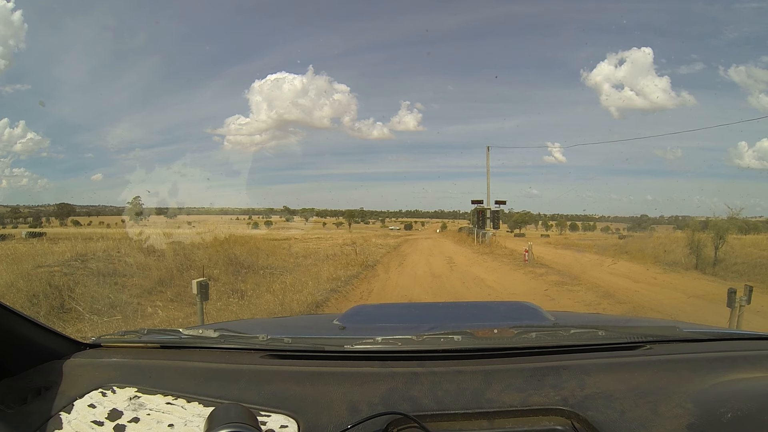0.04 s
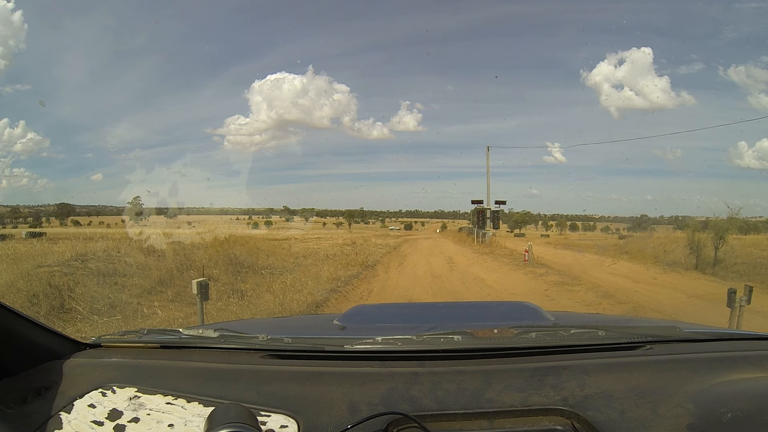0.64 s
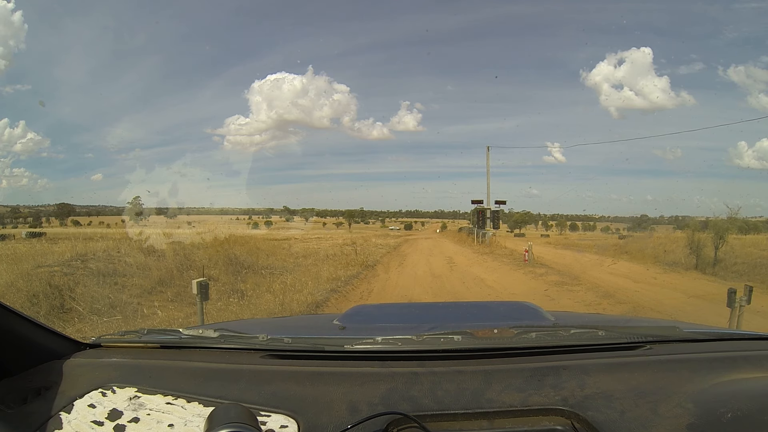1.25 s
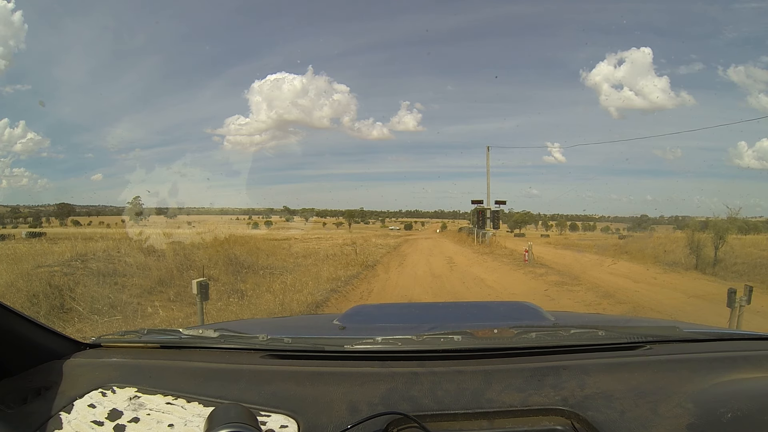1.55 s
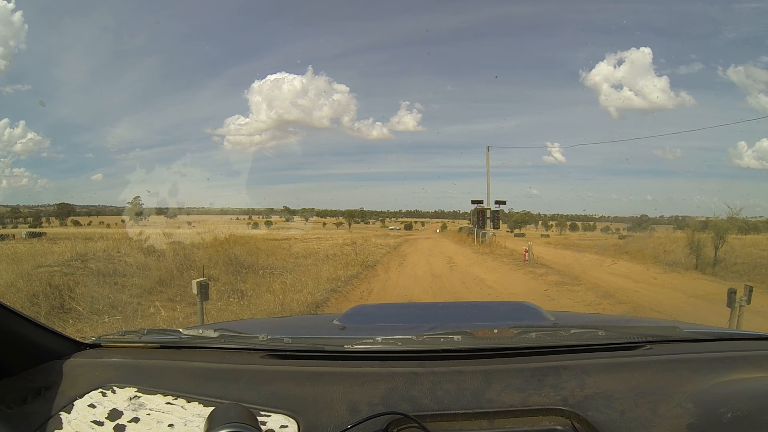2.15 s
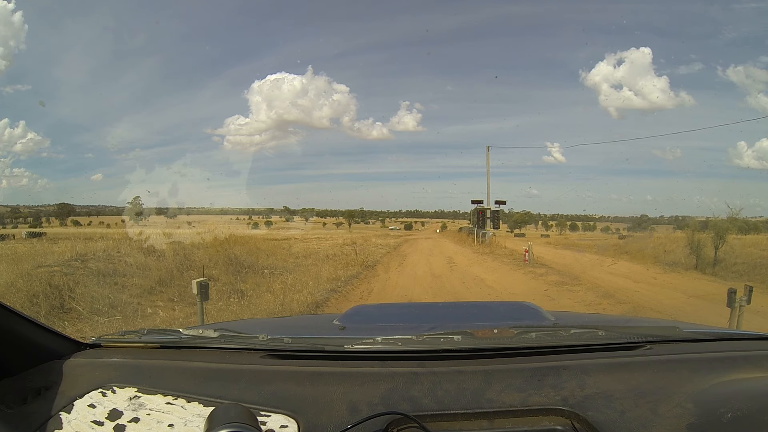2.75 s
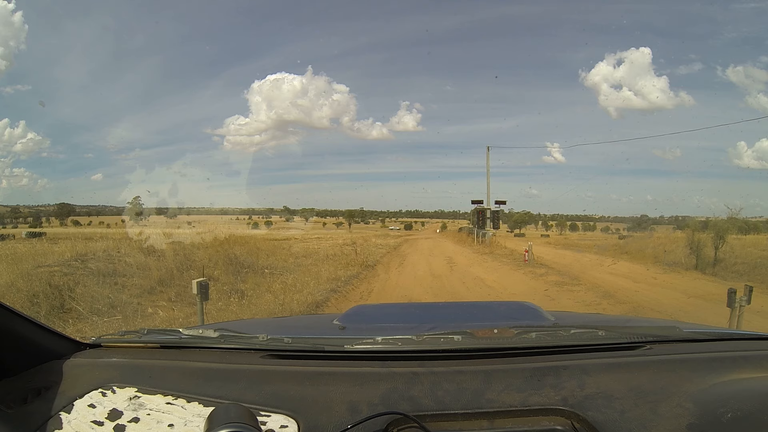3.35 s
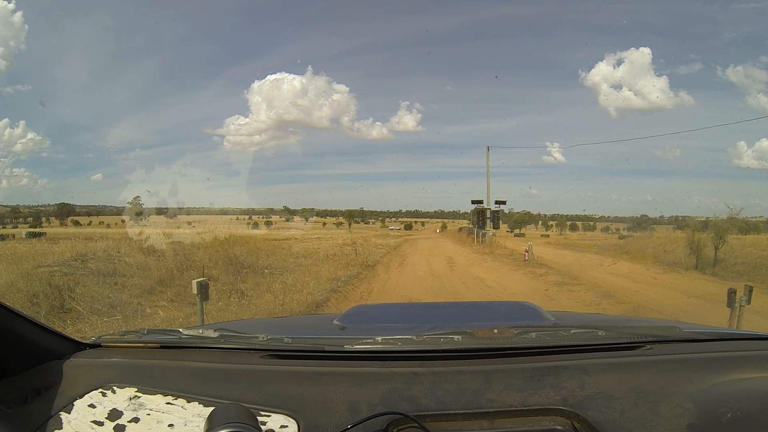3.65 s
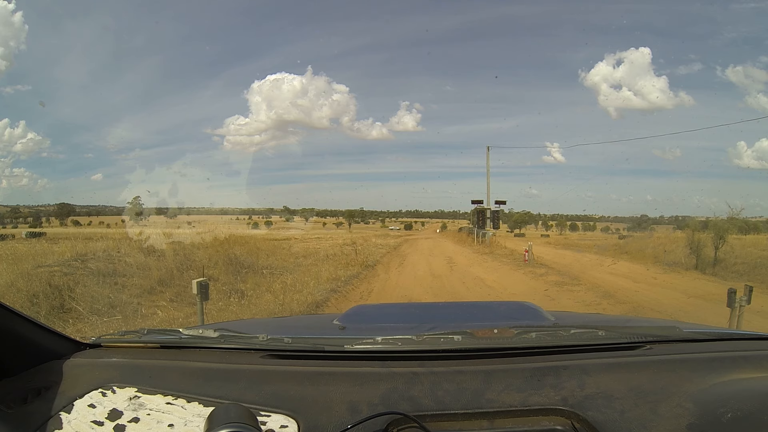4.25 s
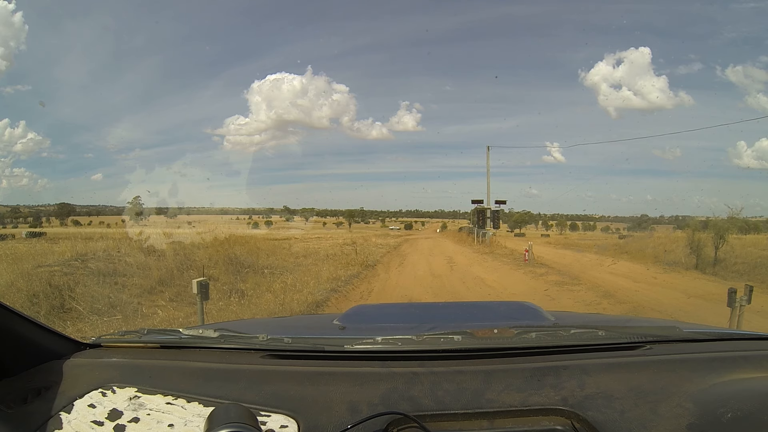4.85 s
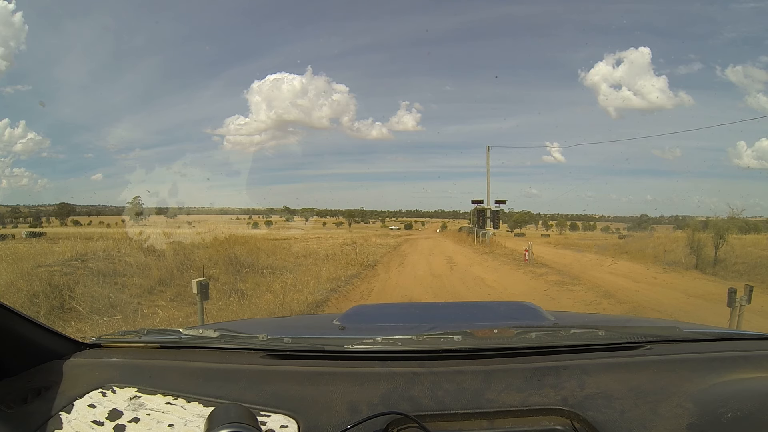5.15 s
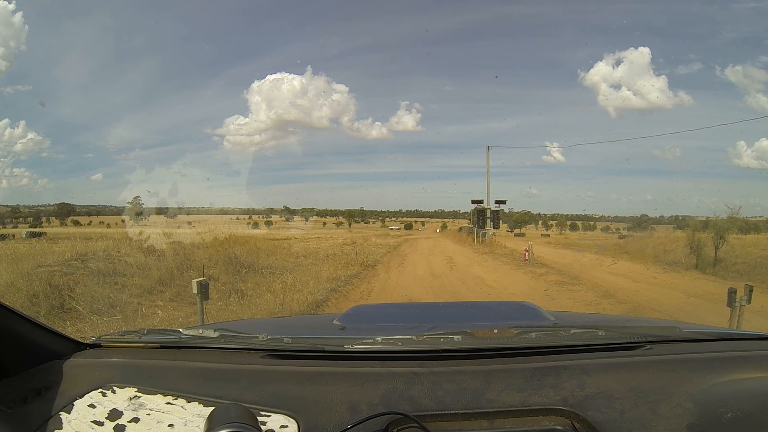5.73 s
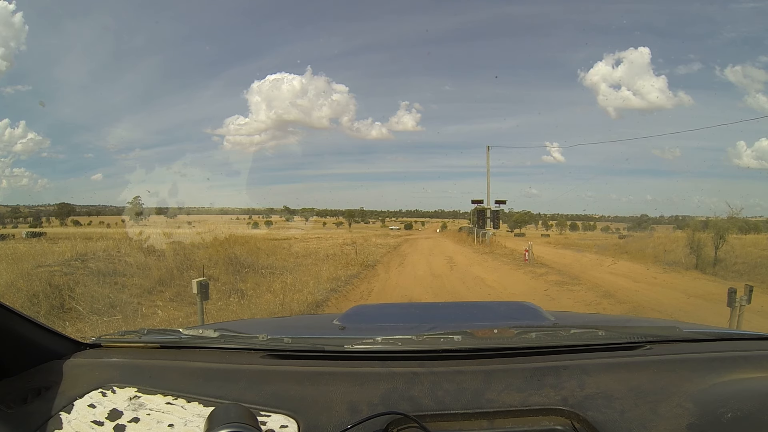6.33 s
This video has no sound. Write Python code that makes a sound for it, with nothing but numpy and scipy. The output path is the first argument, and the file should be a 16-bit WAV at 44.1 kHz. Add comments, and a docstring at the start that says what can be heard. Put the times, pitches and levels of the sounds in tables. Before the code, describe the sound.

From inside a slow car on a dirt road, a throbbing engine is revved in several short, booming blips over steady road noise.

```python
"""Inside a car creeping along a dirt road, one microphone behind the windscreen, tyres and engine bay
rushing over ticking grit throughout. The flat-four is blipped at once, its unevenly spaced exhaust
beats booming in the cabin. At 0.8 s a small metal piece clinks. Three more blips follow, burbling as
the speed rises, each topped by an exhaust bark, the loudest at 2.7 s. The engine then sinks back,
chugging; the metal scrapes faintly at 4.4 s, and a last blip barks at 5.7 s."""
import sys
import numpy as np
from scipy import signal
from scipy.fft import rfft, irfft, next_fast_len
from scipy.io import wavfile
from scipy.ndimage import uniform_filter1d, minimum_filter1d

SR = 44100
rng = np.random.default_rng(int(sys.argv[2]) if len(sys.argv) > 2 else 0)


def int16_out(signal):
    """Quantize to a 16-bit WAV file."""
    q = np.round(np.clip(np.atleast_2d(signal).T, -1, 1) * 32767)
    wavfile.write(sys.argv[1], SR, q.astype(np.int16))


N = 281799
CRUISE_HZ = 80  # reference firing rate

# exhaust tones before the cabin colours them:
# cycle_multiple, cruise_level_db, speed_db_per_octave, full_throttle_db, lugging_db
EXHAUST_TONES = [(2, -32.5, 20.5, -0.5, 5), (3, -21.5, -1.5, -16, 0), (4, -13.5, -11, 2, -0.5),
                 (5, -29.5, 7.5, 9.5, -15), (6, -44.5, 5.5, -9.5, 19), (7, -29, 10.5, 12, -0.5),
                 (8, -35, 15, 17.5, -1.5), (9, -38, 1.5, 4.5, 8.5), (10, -41.5, 4.5, 11.5, 12),
                 (11, -34.5, -1, 7, 3)]
# how strongly the cabin booms at the microphone: pitch_hz, gain_db
CABIN_RESPONSE = [(32, -15.5), (45, -18.5), (50, -5), (54, -4), (60, -1.8), (64, 3), (71, -4), (78, -2),
                  (87, 1.5), (97, 1), (106, 3), (120, 4.5), (137, 6.5), (151, 3.5), (165, -14), (182, -25),
                  (205, -11), (230, -28)]
# one tone of the cycle swells briefly, as the cylinders fall out of balance or at a knock: centre_s,
# half_length_s, cycle_multiple, level_db
EXHAUST_CHUGS = [(.16, 0.022, 6, -13), (0.264, 0.033, 8, -13), (0.573, 0.18, 2, -32.5),
                 (.57, 0.1, 6, -20.5), (1.498, 0.037, 2, -14), (1.505, 0.04, 6, -30), (1.563, .04, 3, -20),
                 (1.798, 0.017, 6, -12.5), (1.805, 0.029, 10, -25.5), (1.976, 0.048, 7, -25.5),
                 (2.22, 0.15, 2, -16), (2.44, 0.13, 4, -20.5), (2.545, 0.021, 9, -27),
                 (2.847, 0.01, 2, -19), (2.99, 0.082, 2, -17.5), (3.02, 0.06, 3, -38),
                 (3.254, 0.2, 2, -34.5), (3.3, .17, 3, -28.5), (3.393, 0.11, 4, -16),
                 (3.624, 0.013, 3, -10), (3.9, .11, 7, -22.5), (3.95, 0.049, 3, -21),
                 (3.974, 0.022, 6, -19), (4.06, 0.094, 8, -25.5), (4.01, .035, 4, -29),
                 (5.44, 0.072, 4, -18), (5.587, .04, 3, -24), (5.87, .09, 3, -31.5), (6.22, .18, 3, -24.5),
                 (6.22, 0.18, 5, -25.5), (6.25, 0.078, 7, -34)]
def exhaust_boom(cycle, firing_hz, load, lugging, dip):
    """Unequal pipes bunch the four firings: side tones make the firing tone throb in the cabin."""
    turn, octaves = 2 * np.pi * cycle, np.log2(firing_hz / CRUISE_HZ)
    cabin_hz, cabin_db = np.transpose(CABIN_RESPONSE)
    full_dip_db, smear_rad = 16.5, .25
    out = from_db(-42) * np.sin(turn)  # the engine rocks on its mounts once a cycle
    for k, db, speed_db, load_db, lugging_db in EXHAUST_TONES:
        resonance_db = np.interp(np.log(k * firing_hz / 4), np.log(cabin_hz), cabin_db)
        drive_db = speed_db * octaves + load_db * load + lugging_db * lugging
        level_db = db + resonance_db + drive_db - full_dip_db * dip
        chug = sum(from_db(chug_db) * bump(s, half_s)
                   for s, half_s, multiple, chug_db in EXHAUST_CHUGS if multiple == k)
        # the bunching wanders a little, so no two throbs are alike
        flutter_db = 1.6 * (k != 4) * drift(7)
        wander = .22 * min(abs(k - 4), 2) * drift(3.5)
        # the cabin delays tones far from the firing tone, softening each throb
        lag = smear_rad * (k - 4) ** 2
        out = out + (from_db(level_db + flutter_db) + chug) * np.sin(k * turn + wander - lag)
    return np.sqrt(2) * out


# engine speed: time_s, firing_hz
ENGINE_SPEED = [(0.0, 49.8), (0.076, 50.0), (0.177, 73.7), (0.263, 50.6), (0.428, 72.3), (0.751, 64.9),
                (1.065, 51.8), (1.409, 99.5), (1.89, 80.9), (2.12, 105.5), (2.583, 88.8), (2.855, 120.3),
                (3.301, 101.1), (3.802, 78.9), (4.205, 66.6), (4.704, 57.1), (5.351, 53.4), (5.587, 87.1),
                (5.702, 96.0), (6.095, 86.4), (6.39, 85.8)]
def crankshaft():
    """The firing rate and the running count of engine cycles, four firings to each."""
    firing_hz = in_time(ENGINE_SPEED)
    return firing_hz, np.cumsum(firing_hz) / (4 * SR)


# presses of the accelerator: down_s, lifted_s, opening (0-1)
PEDAL_PRESSES = [(0, 0.347, 0.71), (1.001, 1.404, 0.46), (1.852, 2.067, 0.76), (2.542, 2.806, 0.5),
                 (5.18, 5.72, 0.54)]
def throttle(down_s, up_s):
    """Throttle opening, 0-1: each press ramps in and out."""
    t = np.arange(N) / SR
    opening = sum(depth * np.clip((t - down) / down_s, 0, 1) * np.clip(1 - (t - lifted) / up_s, 0, 1)
                  for down, lifted, depth in PEDAL_PRESSES)
    return np.clip(opening, 0, 1)


# dips in the exhaust note: centre_s, half_length_s, depth (0-1), shudder (0-1)
EXHAUST_DIPS = [(.06, 0.035, 1, 0.53), (.215, 0.014, 1, 0.4), (.42, 0.015, 0.6, 0.16),
                (.48, 0.06, 0.27, 0.2), (1.04, 0.032, 1, 0.04), (1.27, 0.043, 0.36, 0.23),
                (1.52, 0.034, 0.04, 0.33), (1.858, 0.057, 0.56, 0.35), (2.14, 0.03, 0.4, 0.4),
                (2.555, 0.019, 0.9, .55), (3.675, 0.02, 0.7, 0), (4.074, 0.015, 0.8, 0.04),
                (5.53, 0.033, 0.15, 0), (5.868, 0.41, 0.13, 0.04)]
def exhaust_dips():
    """Brief stumbles and slower sags in loudness, and the low shudder that comes with them."""
    return swells(EXHAUST_DIPS)


# further overtones of the engine cycle: cycle_multiple, relative_db
ENGINE_OVERTONES = [(6, -3.5), (8, 3.5), (9, -1.5), (10, -7.5), (11, 4.5), (12, -4), (13, 3.5), (14, 1),
                    (15, -9), (16, -3), (17, 0), (19, -9.5), (20, -11.5)]
# modes of the cabin air around the microphone: pitch_hz, width_hz, gain_db
CABIN_AIR_MODES = [(61, 31.5, 2.5), (120, 50, -2.5), (153, 22, -3.5)]
def cabin_rumble(cycle, lugging, shudder, duck_db):
    """Overtones and unequal firings shake the cabin air, most in a shudder or when the engine lugs."""
    level_db = -25.5 + 0.21 * duck_db + np.maximum(16.5 * shudder, 10 * lugging)
    tones = overtones(cycle, ENGINE_OVERTONES, flutter_db=-4.0, wander_rad=1.0)
    steady = evened(resonate(tones, CABIN_AIR_MODES))
    uneven = .7 * evened(resonate(firing_errors(cycle), CABIN_AIR_MODES))
    return from_db(level_db) * evened(band(steady + uneven, 45, 146, order=4))


# overtones under load: cycle_multiple, relative_db
LOAD_OVERTONES = [(8, -3.5), (9, -16.5), (11, -22), (12, 7.5), (13, -12), (14, -11.5), (16, -7), (17, -10)]
# panels that sing under load: pitch_hz, width_hz, gain_db
SINGING_MODES = [(204.4, 11, 2.5), (294.4, 18, -7), (393, 30, -15.5)]
# barks at the top of each blip: centre_s, half_length_s, level_db
EXHAUST_BARKS = [(.15, .06, -28), (1.385, .035, -25), (2.065, .085, -17.5), (2.712, .06, -14.5),
                 (5.7, .08, -29)]
def exhaust_bark(cycle):
    """The panels sing roughly as the overtones of each blip sweep through them."""
    tones = overtones(cycle, LOAD_OVERTONES, flutter_db=1.3, wander_rad=.2)
    singing = evened(resonate(tones, SINGING_MODES)) * (1 + .17 * drift(45))
    return singing * sum(from_db(db) * bump(s, half_s) for s, half_s, db in EXHAUST_BARKS)


# body panels around the microphone: pitch_hz, width_hz, gain_db
PANEL_MODES = [(206.4, 8.6, 3.5), (256, 19, -1.5), (288.3, 29, -6.5), (325.5, 15.3, -4.5), (384.8, 18, -12)]
def panel_mutter(cycle, firing_hz, load, shudder, duck_db, buzz_db, roughness):
    """The panels mutter with the ragged firings and buzz at each jolt."""
    speed_db = 2 * np.log2(firing_hz / CRUISE_HZ)
    level_db = -32.5 + duck_db - 0.5 * shudder + 3 * load + speed_db + buzz_db
    puffs = rms_one(firing_errors(cycle) + 0.024 * rng.standard_normal(N))
    tones = overtones(cycle, ENGINE_OVERTONES, flutter_db=4.5, wander_rad=0.97)
    ragged = evened(resonate(tones, PANEL_MODES)) + roughness * evened(resonate(puffs, PANEL_MODES))
    return from_db(level_db) * evened(band(ragged, 197.4, 456, order=4))


# jolts of the engine: centre_s, half_length_s, buzz_change_db, roar_change_db
ENGINE_JOLTS = [(.125, 0.032, 1, 0), (.25, 0.023, 0.5, -2), (1.2, 0.11, 5.5, -0.5), (1.35, 0.047, 3, 0),
                (1.803, .022, 4.5, 3), (2.224, 0.054, 2, -1), (2.545, 0.036, 9, -1.5),
                (2.82, 0.11, 1.5, 1.5), (3.65, 0.035, 6.5, -1.5), (3.88, 0.091, 2.5, 0),
                (4.23, 0.11, 2.5, 1), (6.36, .025, 4, 1)]
def jolts():
    """Each jolt lifts the panels' buzz and may shift the engine bay's roar."""
    return swells(ENGINE_JOLTS)


# the roar, from inside the cabin: frequency_hz, relative_db
ROAR_SPECTRUM = [(22, 3), (36, 6.5), (70, 12), (200, -1.5), (330, 5.5), (440, 3.5), (530, -2), (640, 0),
                 (790, -4), (870, 0.5), (1050, -5), (1200, -11), (2200, -13.5), (2900, -22)]
# the hiss above it: frequency_hz, relative_db
HISS_SPECTRUM = [(1800, -4.5), (2700, -4), (3300, 0), (4800, -0.5), (6000, -6), (7800, -8.5), (9200, -9.5),
                 (10000, -14), (11200, -16), (13000, -30), (15500, -35)]
def road_noise(cycle, duck_db, jolt_db, load, pulsing, grit_per_s, grit_db):
    """Tyres and engine bay rush over fine grit; the firings chop the roar more deeply under load."""
    beat = np.cos(8 * np.pi * cycle)
    chopped = (1 + (pulsing + 0.16 * load) * beat) * rng.standard_normal(N)
    roar = coloured(chopped, ROAR_SPECTRUM) * from_db(0.4 * drift(16))
    grit = (rng.random(N) < grit_per_s / SR) * rng.standard_normal(N)
    rush = (1 + pulsing * beat) * rng.standard_normal(N)
    hiss = coloured(rush + from_db(grit_db) * rms_one(grit), HISS_SPECTRUM) * from_db(0.58 * drift(31))
    return from_db(-32 + duck_db + jolt_db) * roar + from_db(-53.5 + 0.93 * duck_db) * hiss


# the recorder's gain as heard on the background, a set curve: time_s, relative_db
RECORDER_GAIN = [(0, -37.5), (0.24, -41), (0.36, -45), (0.74, -43.5), (0.9, -46.5), (1.25, -44.5),
                 (1.85, -42), (2.8, -41.5), (3.8, -42), (4.62, -42), (5.15, -38), (5.34, -39), (5.48, -44),
                 (5.69, -44.5), (6.04, -40.5), (6.39, -39.5)]
def background_ducking():
    """The background rush ducks as the recorder's gain drops under loud bass, then recovers."""
    gain_db = in_time(RECORDER_GAIN)
    return gain_db - gain_db.mean()


def windscreen_echo(x, delay_s, gain):
    """The nearby glass returns the noise to the microphone a moment later, rippling its spectrum."""
    return x - gain * np.interp(np.arange(N) - delay_s * SR, np.arange(N), x, left=0)


# light touches of loose metal: start_s, level_db, ringing (0-1)
METAL_TOUCHES = [(.794, -53, .3), (.802, -47, 1), (.806, -46, 1), (.817, -54, 0), (.831, -53, .3),
                 (4.449, -48.5, 0)]
# modes of the piece: pitch_hz, relative_db, t60_s
METAL_MODES = [(2350, 5.5, .025), (3400, 5, .03), (4650, -2, .025), (6650, -2, .035), (7150, 3, .03),
               (7380, 0, .03), (10500, -6, .018)]
def metal_clink(scrape_db, scrape_s):
    """Each touch is a short scrape that may ring the metal's modes."""
    t, out = np.arange(N // 20) / SR, np.zeros(N)
    for s, db, ringing in METAL_TOUCHES:
        scrape = band(rng.standard_normal(len(t)), 1400, 7600, order=3)
        touch = from_db(scrape_db) * scrape * np.exp(-t / scrape_s)
        for hz, mode_db, t60 in METAL_MODES:
            ring = from_db(mode_db - 60 * t / t60) * np.sin(2 * np.pi * hz * t)
            touch += ringing * ring * rng.choice([-1, 1])
        start = int(s * SR)
        out[start:start + len(t)] += from_db(db) * touch
    return out


def metal_ping(start_s, pitch_hz, level_db, attack_s, hold_s, t60_s):
    """One high mode swells into a short ping as the piece slides."""
    t = np.arange(N) / SR - start_s
    attack = np.clip(t / attack_s, 0, 1)
    released_s = np.clip(t - attack_s - hold_s, 0, 1)
    return from_db(level_db - 60 * released_s / t60_s) * attack * np.sin(2 * np.pi * pitch_hz * t)


def overtones(cycle, orders, flutter_db, wander_rad):
    """Multiples of the cycle rate, each unsteady in strength and phase."""
    turn = 2 * np.pi * cycle
    return sum(from_db(db + flutter_db * drift(2.8)) * np.cos(k * turn + wander_rad * drift(5.2))
               for k, db in orders)


def firing_errors(cycle):
    """One click per firing, as large as that firing is stronger or weaker than usual."""
    firings = np.flatnonzero(np.diff(np.floor(4 * cycle)))
    clicks = np.zeros(N)
    clicks[firings] = rng.standard_normal(2000)[:len(firings)]
    return clicks


def from_db(db):
    """Decibels to gain."""
    return 10 ** (np.asarray(db) / 20)


def rms_one(x):
    """Scale to unit power."""
    return x / np.sqrt(np.mean(x ** 2) + 1e-20)


def in_time(rows):
    """A curve of (time_s, value) points at every sample."""
    return np.interp(np.arange(N) / SR, *np.transpose(rows))


def bump(s, half_s):
    """A smooth swell of height 1 around time s."""
    return np.exp(-((np.arange(N) / SR - s) / half_s) ** 2)


def swells(rows):
    """Each column after centre and half length as a sum of smooth bumps."""
    return sum(np.outer(heights, bump(s, half_s)) for s, half_s, *heights in rows)


def drift(rate_hz):
    """A slow random wander of spread 1."""
    hop = 40
    r = np.exp(-2 * np.pi * rate_hz * hop / SR)
    slow = signal.lfilter([1], [1, -2 * r, r * r], rng.standard_normal(N // hop + 2002))[2000:]
    return np.interp(np.arange(N) / hop, np.arange(len(slow)), rms_one(slow))


def evened(x, size=3000):
    """Hold the power at 1 over a few engine cycles, keeping the beat inside them."""
    power = uniform_filter1d(uniform_filter1d(x ** 2, size), size)
    return x / np.sqrt(np.abs(power) + 1e-12)


def band(x, low_hz, high_hz, order):
    """Band-pass."""
    sos = signal.butter(order, [low_hz, high_hz], "band", fs=SR, output="sos")
    return signal.sosfilt(sos, x + 1e-18)


def resonate(x, modes):
    """Parallel resonances with alternating signs."""
    out = 0
    for k, (hz, width, db) in enumerate(modes):
        r = np.exp(-np.pi * width / SR)
        poles = [1, -2 * r * np.cos(2 * np.pi * hz / SR), r * r]
        ring = (1 - r * r) / 2 * signal.lfilter([1, 0, -1], poles, x + 1e-18)
        out = out + (-1) ** k * from_db(db) * ring
    return out


def coloured(x, spectrum):
    """Give x a spectrum that falls 23 dB an octave beyond its ends; rms 1."""
    hz, db = np.transpose(spectrum)
    size = next_fast_len(N)
    octave, knots = np.log2(np.arange(size // 2 + 1) * SR / size + 1), np.log2(hz)
    outside = np.abs(octave - np.clip(octave, knots[0], knots[-1]))
    gain = from_db(np.interp(octave, knots, db) - 23 * outside)
    return rms_one(irfft(rfft(x, size) * gain, size)[:N])


def limited(x, ceiling, size=900):
    """A limiter eases the gain down around each peak that would pass the ceiling."""
    gain = minimum_filter1d(ceiling / np.maximum(np.abs(x), ceiling), 2 * size)
    return x * uniform_filter1d(uniform_filter1d(gain, size), size)


def scene():
    """Engine, road and loose metal at one microphone behind the windscreen."""
    firing_hz, cycle = crankshaft()
    load = throttle(down_s=0.13, up_s=0.073)
    lugging = load * np.clip(4 * np.log2(CRUISE_HZ / firing_hz), 0, 1)  # throttle open at low speed
    dip, shudder = exhaust_dips()
    buzz_db, roar_db = jolts()
    duck_db = background_ducking()
    engine = exhaust_boom(cycle, firing_hz, load, lugging, dip)
    engine += cabin_rumble(cycle, lugging, shudder, duck_db)
    engine += panel_mutter(cycle, firing_hz, load, shudder, duck_db, buzz_db, roughness=2.57)
    engine += exhaust_bark(cycle)
    road = road_noise(cycle, duck_db, roar_db, load, pulsing=0.085, grit_per_s=220, grit_db=-17.5)
    road = windscreen_echo(road, delay_s=0.0058, gain=.13)
    metal = metal_clink(scrape_db=8.0, scrape_s=0.01)
    metal += metal_ping(start_s=.803, pitch_hz=8253, level_db=-50.5,
                        attack_s=.012, hold_s=.018, t60_s=.075)
    return (engine + road + metal)[None]


def record(dry):
    """After the microphone: peaks are limited, the ends fade over 4 ms and the top is cut."""
    fade = np.clip(np.minimum(np.arange(N), np.arange(N)[::-1]) / (.004 * SR), 0, 1)
    low_pass = signal.cheby2(12, 70, 15700, fs=SR, output="sos")
    return signal.sosfilt(low_pass, limited(dry, ceiling=.8) * np.sin(np.pi / 2 * fade) ** 2)


dry = scene()
out = record(dry)
int16_out(out)
```